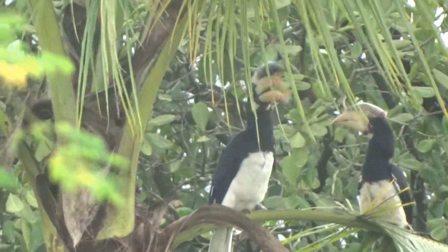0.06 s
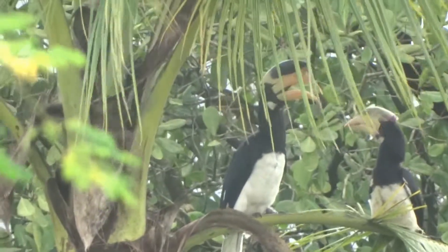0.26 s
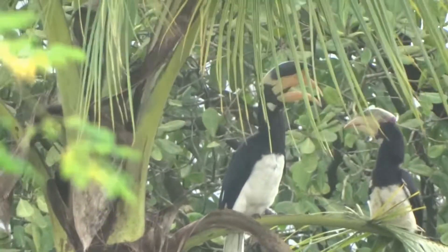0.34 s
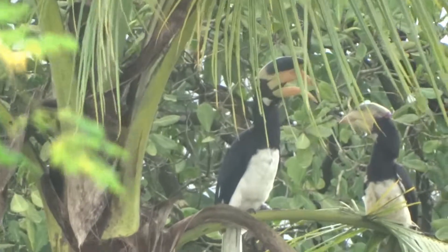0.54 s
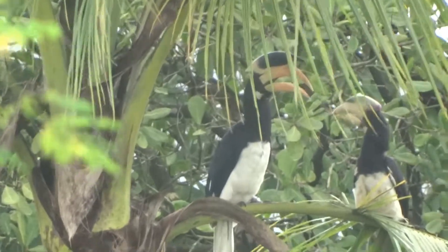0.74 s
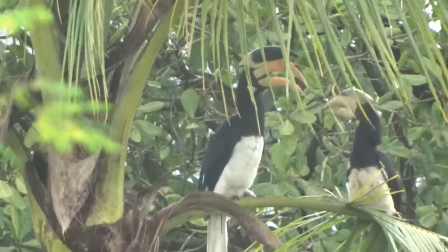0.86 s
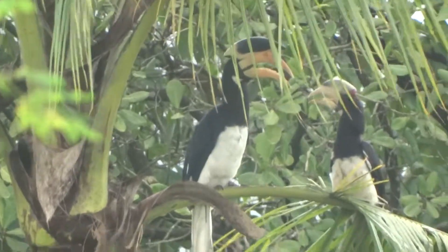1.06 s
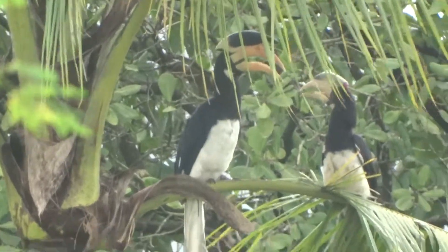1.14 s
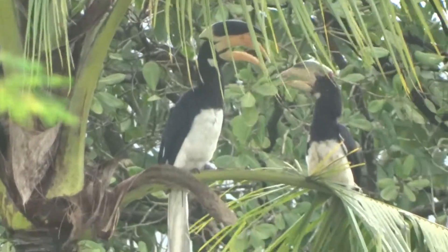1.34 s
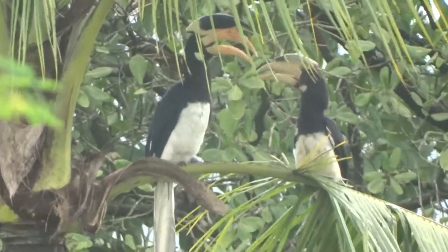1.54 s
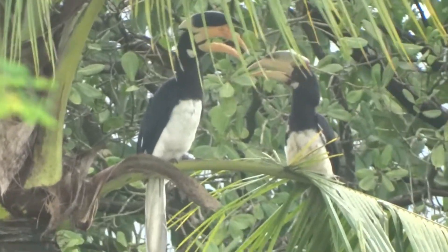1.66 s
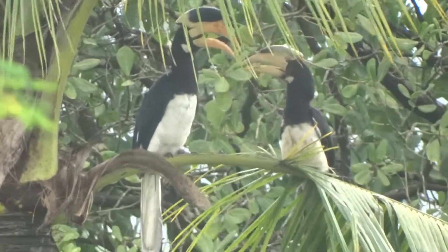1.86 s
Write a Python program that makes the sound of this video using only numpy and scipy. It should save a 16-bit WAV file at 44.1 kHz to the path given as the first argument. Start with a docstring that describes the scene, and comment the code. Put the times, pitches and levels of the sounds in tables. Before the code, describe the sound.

Two large hornbills squawk harshly back and forth, yelping, honking and croaking among echoing trees

```python
"""Two hornbills squawk in a palm: bright arched yelps, a longer honk, hoarse caws and croaks.
Each call is a stack of harmonics coloured by a throat; roughness blurs them. The trees echo the birds.
A small bird chirps first in gliding whistles. A few knocks and ticks close by are short noise bursts.
Behind them, filtered noise makes the air and leaves, a high insect hiss, a distant engine rumble
and a broad band of low air that swells along with the engine."""
import sys
import numpy as np
from scipy import signal
from scipy.fft import rfft, irfft
from scipy.io import wavfile
from scipy.ndimage import uniform_filter1d

SR = 44100
rng = np.random.default_rng(int(sys.argv[2]) if len(sys.argv) > 2 else 0)


def store_wav(level_fs):
    """Save 16-bit WAV to argv[1]."""
    pcm = np.round(np.clip(np.atleast_2d(level_fs), -1, 1) * 32767)
    wavfile.write(sys.argv[1], SR, pcm.T.astype(np.int16))


def gain_from_decibels(decibels):
    """Convert decibel values to linear amplitude factors."""
    exponent = np.asarray(decibels, float) / 20
    return 10 ** exponent


N = 83790  # length of the scene [samples], 1.9 s


def unit(x):
    """Scale to an rms of 1."""
    return x / np.sqrt(np.mean(np.abs(x) ** 2))


def at(table, hz):
    """Read a table of (frequency [Hz], value) on a log-frequency axis."""
    table_hz, values = np.array(table, float).T
    return np.interp(np.log(np.maximum(hz, 1)), np.log(table_hz), values)


def shaped(gain, n=N):
    """White noise filtered by a gain that is a function of frequency."""
    spectrum = rfft(rng.standard_normal(n))
    return irfft(spectrum * gain(np.fft.rfftfreq(n, 1 / SR)), n)


def walk(hz, n=N):
    """Random wandering with an rms of 1, mostly slower than hz."""
    return unit(shaped(lambda f: 1 / (1 + (f / hz) ** 2) * (f > 0), n))


def noise_band(hz, width_hz):
    """Noise with a bell-shaped spectrum round hz and an rms of 1."""
    return unit(shaped(lambda f: np.exp(-((f - hz) / width_hz) ** 2)))


def air_and_leaves():
    """Broad noise whose middle wavers slightly, with a weaker independent side part; mid and side."""
    # spectrum of the air and leaves: (frequency [Hz], relative level [dB])
    air_colour = [(18, -39), (30, -25), (201, -2), (556, -16.5), (878, -9.5), (2300, -23.5), (4130, -22.5),
                  (5750, -26.5), (7790, -29.5), (10000, -29), (11500, -47), (16800, -85)]
    level_db, side_db, waver_db, waver_hz = -55.5, -9.5, 1.0, 14
    mid = unit(shaped(lambda f: gain_from_decibels(at(air_colour, f))))
    mid = mid * gain_from_decibels(level_db + waver_db * walk(waver_hz))
    # the side part has less bass
    side = unit(shaped(lambda f: gain_from_decibels(at(air_colour, f)) * f / (f + 600)))
    return mid, side * gain_from_decibels(level_db + side_db)


def insects():
    """A band of high noise that flickers in level."""
    centre_hz, width_hz, level_db = 7530, 600, -61
    flicker_db, flicker_hz = 2.0, 37
    return noise_band(centre_hz, width_hz) * gain_from_decibels(level_db + flicker_db * walk(flicker_hz))


def engine_and_low_air():
    """Two narrow noise bands as engine rumble, plus a broad band of low air that swells along with it."""
    # two engine bands, then the low air: (centre [Hz], width [Hz], level before the swell [dB])
    low_bands = [(82, 18, -69.5), (133.6, 33, -62), (250, 500, -66.5)]
    # swell shared by the engine and the low air: (time [s], gain [dB])
    swell_points = [(0, -3.5), (.45, 7.5), (1, 8), (1.4, 13), (1.9, 7.5)]
    low_noise = sum(gain_from_decibels(db) * noise_band(hz, width_hz) for hz, width_hz, db in low_bands)
    swell_db = np.interp(np.arange(N) / SR, *np.array(swell_points).T)
    return low_noise * gain_from_decibels(swell_db)


def grove(x):
    """Scattering off trunks and leaves: decaying noise, shorter in the treble; mid and side."""
    # time for the ringing to fall by 60 dB: (frequency [Hz], time [s])
    ringing_times = [(2000, 0.85), (5000, 0.68), (12000, 0.5)]
    mid_db, side_db, build_up_s = -3, -19, 0.005  # the side is relative to the mid
    t = np.arange(SR) / SR
    parts = []
    for echo_db, tilt_db in ((mid_db, 0.6), (mid_db + side_db, -3.0)):  # tilt per octave
        echo = np.zeros(SR)
        for hz in 350 * 2 ** np.arange(0, 5.6, 0.5):
            band = shaped(lambda f: np.exp(-(np.log2((f + 1) / hz) / 0.5) ** 2), SR)
            decay_db = -60 * t / at(ringing_times, hz)
            echo += band * gain_from_decibels(decay_db + tilt_db * np.log2(hz / 1000))
        echo = echo * (1 - np.exp(-t / build_up_s))
        echo = echo / np.sqrt(np.sum(echo ** 2))
        parts.append(gain_from_decibels(echo_db) * signal.fftconvolve(x, echo)[:N])
    return parts


def knocks():
    """Short bursts of noise round one broad resonance, each dying away."""
    # knocks and ticks: (time [s], level before the decay [dB], resonance [Hz], time to fall 60 dB [s])
    knock_list = [(1.144, -35, 220, .06), (1.229, -38, 900, .04), (1.817, -37, 3800, .03),
                  (1.872, -46, 2800, .03)]
    out, n = np.zeros(N), 1024
    t = np.arange(n) / SR

    def resonance(f, hz):
        peak = 1 / np.sqrt(1 + (f / hz - hz / (f + 1)) ** 2)
        treble_cut = 1 + (f / 8000) ** 8
        bass_cut = 1 + (60 / (f + 1)) ** 4
        return peak / treble_cut / bass_cut

    for start_s, db, hz, t60 in knock_list:
        burst = unit(shaped(lambda f: resonance(f, hz), n))
        burst = burst * gain_from_decibels(-60 * t / t60) * np.minimum(t / 0.003, 1)  # 3 ms fade-in
        out[int(start_s * SR):][:n] += gain_from_decibels(db) * burst
    return out


def small_bird():
    """Pure whistles whose pitch rises quickly and falls slowly."""
    # chirps: (start [s], length [s], start pitch [Hz], top before smoothing [Hz], end pitch [Hz], level [dB])
    chirp_list = [(0.015, 0.055, 3640, 4110, 3780, -61.5), (0.064, 0.044, 4100, 4550, 3770, -55),
                  (0.162, 0.021, 3620, 4230, 3720, -52)]
    out = np.zeros(N)
    for start_s, length_s, start_hz, top_hz, end_hz, db in chirp_list:
        n = int(length_s * SR)
        hz = np.interp(np.linspace(0, 1, n), [0, 0.35, 1], [start_hz, top_hz, end_hz])
        hz = uniform_filter1d(hz, n // 4)
        whistle = np.sqrt(2) * np.sin(2 * np.pi * np.cumsum(hz) / SR)
        out[int(start_s * SR):][:n] += gain_from_decibels(db) * signal.windows.tukey(n, 0.5) * whistle
    return out


def voice(rows, throat, mouth_oct=None):
    """Harmonics of a vibrating membrane through the throat; roughness blurs them and can add lines between."""
    # rows: (time [s], pitch [Hz], level [dB], roughness 0-1, and with mouth_oct: mouth resonance [Hz])
    waver, jitter = 0.0037, 0.034  # pitch unsteadiness, as fractions: always, and at full roughness
    rasp_hz = 180  # how far roughness spreads each line
    half_db, mouth_db = 5, 14  # lines between harmonics at full roughness; boost at the mouth resonance
    flutter_db, flutter_hz, grain_db, grain_hz = 3.0, 45, 4.0, 220
    steady_below_hz = 3000  # lines below this flutter and rasp less
    rows = np.array(rows, float)
    times = rows[:, 0]
    first, last = int(times[0] * SR), int(times[-1] * SR)
    t = np.arange(first, last) / SR

    def wander(rate_hz):
        return walk(rate_hz, 2 ** 14)[:len(t)]

    hz, db, rough = (np.interp(t, times, rows[:, column]) for column in (1, 2, 3))
    rough = np.clip(rough, 0, 1)
    hz = hz * (1 + waver * wander(56) + jitter * rough * wander(89))
    phase = 2 * np.pi * np.cumsum(hz) / SR
    sound, power = 0, 0
    # only high calls have lines halfway between the harmonics
    spacing = 0.5 if hz.mean() > 700 else 1
    for k in np.arange(1, 13500 / hz.mean(), spacing):
        line_hz = k * hz
        mouth = 0
        if mouth_oct:
            octaves_away = np.log2(line_hz / np.interp(t, times, rows[:, -1]))
            mouth = np.exp(-(octaves_away / mouth_oct) ** 2)
        gain = gain_from_decibels(at(throat, line_hz) + mouth_db * mouth)
        if k % 1 != 0:
            gain = gain * rough * gain_from_decibels(half_db)
        loose = np.minimum((line_hz / steady_below_hz) ** 2 + rough, 1)
        # part of each line stays clean, the rest is blurred by noise
        rasp = (wander(rasp_hz) + 1j * wander(rasp_hz)) / np.sqrt(2)
        blur = np.sqrt(1 - rough * loose) + np.sqrt(rough * loose) * rasp
        line = np.real(blur * np.exp(1j * (k * phase + 2 * np.pi * rng.random())))
        sound = sound + gain * gain_from_decibels(flutter_db * loose * wander(flutter_hz)) * line
        power = power + gain ** 2 / 2
    # even out the throat's loudness, then follow the level curve
    grainy_db = db + grain_db * rough * wander(grain_hz)
    out = np.zeros(N)
    out[first:last] = sound / np.sqrt(power) * gain_from_decibels(grainy_db) * signal.windows.tukey(len(t), 0.2)
    return out


def croaks():
    """Hoarse croaks: rough voices with a broad mouth resonance."""
    # croaks: (roughness 0-1, mouth resonance [Hz], rows of (time [s], pitch [Hz], level [dB]))
    croak_list = [(.27, 3800, [(.218, 720, -54), (.236, 835, -41), (.272, 1010, -35), (.285, 1030, -42)]),
                  (.2, 3400, [(.492, 1050, -48), (.511, 1230, -35), (.526, 1260, -46)]),
                  (.3, 3300, [(.516, 830, -42), (.524, 870, -35), (.536, 955, -35), (.55, 980, -50)]),
                  (0.41, 2190, [(.592, 779.5, -36), (.61, 790, -39), (.64, 877, -37.5), (.685, 1010, -53)]),
                  (0.21, 2970, [(.806, 1039, -55), (.82, 1081, -39), (.85, 1068, -36), (.878, 1007, -46)]),
                  (.5, 3900, [(.966, 1050, -45), (.984, 1070, -31), (1.0, 1020, -30), (1.038, 1070, -30.5),
                  (1.05, 1050, -44)]), (.55, 2800, [(1.168, 531, -49), (1.185, 549.7, -38),
                  (1.212, 571, -43), (1.23, 530, -52)]), (.7, 1500, [(1.25, 520, -50), (1.34, 532, -52)]),
                  (.26, 3600, [(1.338, 1140, -50), (1.352, 1180, -41), (1.385, 1260, -39),
                  (1.43, 1290, -47)]), (0.47, 3120, [(1.47, 544.7, -42.5), (1.525, 526.2, -37.5),
                  (1.555, 515.6, -46), (1.575, 514, -56)])]
    # colour of the throat: (frequency [Hz], relative level [dB])
    croak_throat = [(550, -40), (1100, 3), (1700, 10), (2150, 7), (3300, -8.5), (4100, 1), (5000, -1.5),
                    (6000, -7.5), (7800, 0), (9200, -12.5), (11000, -43.5)]
    out = np.zeros(N)
    for rough, mouth_hz, points in croak_list:
        rows = [(*point, rough, mouth_hz) for point in points]
        out += voice(rows, croak_throat, mouth_oct=0.6)
    return out


def caws():
    """Low, slightly rough caws with a narrow, moving mouth resonance."""
    # the two caws: (time [s], pitch [Hz], level [dB], mouth resonance [Hz])
    first_caw = [(.845, 543.7, -43, 1670), (.865, 532.2, -36, 1782), (.91, 581.2, -36.5, 1890),
                 (.97, 590.2, -37, 1776), (1.04, 590, -44, 2950), (1.07, 590, -42, 2950),
                 (1.15, 590, -43, 2950), (1.17, 590, -60, 2950)]
    second_caw = [(1.383, 575.4, -55, 1745), (1.395, 582, -37, 1745), (1.46, 580, -40, 1745),
                  (1.475, 580, -43, 3500), (1.52, 581, -42, 4070), (1.702, 582, -54, 2900)]
    # colour of the throat: (frequency [Hz], relative level [dB])
    caw_throat = [(590, -12.5), (1180, 5), (1770, 0.5), (2360, -11), (2950, 1), (3530, 2), (4120, 1),
                  (4700, -2), (5300, -3), (5900, -17), (9000, -18), (11000, -63)]
    rough = 0.16
    out = np.zeros(N)
    for points in (first_caw, second_caw):
        rows = [(s, hz, db, rough, mouth_hz) for s, hz, db, mouth_hz in points]
        out += voice(rows, caw_throat, mouth_oct=0.17)
    return out


def honk():
    """The second bird's longer honk: its harmonics fade towards the treble."""
    # the honk: (time [s], pitch [Hz], level [dB], roughness 0-1)
    honk_rows = [(.64, 1044, -17, 0.42), (.66, 1085, -42.5, 0.07), (.735, 1197, -35.5, 0.12),
                 (.76, 1236, -33.5, 0.06), (.83, 1207, -34.5, 0.1), (.85, 1068, -37.5, 0.63),
                 (.872, 913, -37, 0.6)]
    # colour of the throat: (frequency [Hz], relative level [dB])
    honk_throat = [(800, -4.5), (1220, -4), (2450, -13.5), (3700, -9.5), (4900, -9.5), (6150, -14.5),
                   (7400, -25.5), (8600, -20.5), (10000, -43.5), (12000, -70)]
    return voice(honk_rows, honk_throat)


def yelps():
    """The near bird's two bright yelps: pitch arches up and down, with strong high harmonics."""
    # the two yelps: (time [s], pitch [Hz], level [dB], roughness 0-1)
    first_yelp = [(.262, 1033, -33, 0.42), (.276, 1162, -34.5, 0.26), (.29, 1168, -32.5, 0.01),
                  (.312, 1175, -30, 0.02), (.324, 1097, -32.5, 0.3), (.338, 983, -35.5, 0.4)]
    second_yelp = [(.525, 1002, -40.5, 0.33), (.547, 1154, -32, 0.08), (.57, 1166, -32.5, 0.04),
                   (.589, 1145, -31.5, 0.08), (.6, 1053, -38, 0.34), (.612, 890, -42, 0.35)]
    # colour of the throat: (frequency [Hz], relative level [dB])
    yelp_throat = [(800, -34), (1170, -1), (2340, -6), (3500, -3), (4680, 1), (5850, -2.5), (7000, -0.5),
                   (8200, 0), (9300, -7), (10500, -29.5), (11700, -23), (12900, -33), (14000, -62)]
    return voice(first_yelp, yelp_throat) + voice(second_yelp, yelp_throat)


def hornbills():
    """All calls of the two birds added together."""
    return yelps() + honk() + caws() + croaks()


def scene():
    """Birds direct and scattered, with the knocks, slightly left, over the background."""
    birds = hornbills() + small_bird()
    echo, echo_side = grove(birds)
    air, air_side = air_and_leaves()
    background = air + insects() + engine_and_low_air()
    left_over_right_db = 0.97
    pan = gain_from_decibels(np.array([[1], [-1]]) * left_over_right_db / 2)
    # the side signal is added on the left and subtracted on the right
    side = (air_side + echo_side) * np.array([[1], [-1]])
    return (birds + echo + knocks()) * pan + background + side


def low_pass(x):
    """Removes everything above the highest recorded frequency."""
    return signal.sosfilt(signal.butter(12, 13100, fs=SR, output="sos"), x)


def record(dry):
    """Turn the finished mix into the final sound."""
    return low_pass(dry)


dry = scene()
out = record(dry)
store_wav(out)
```